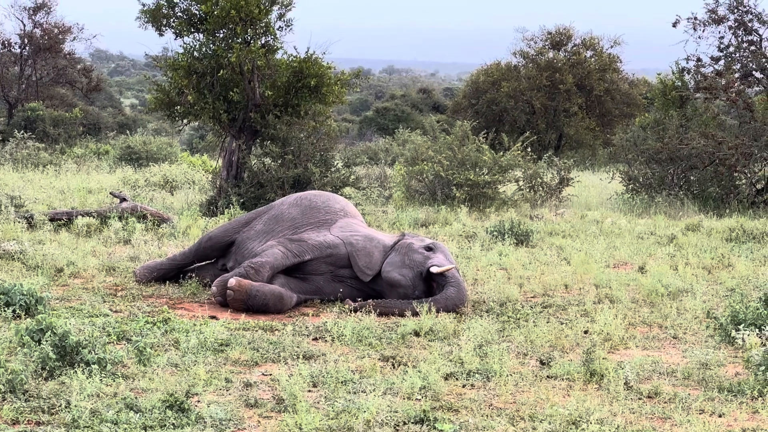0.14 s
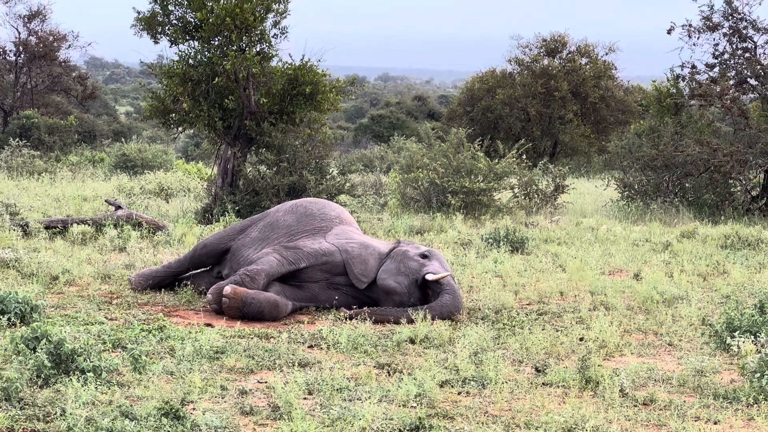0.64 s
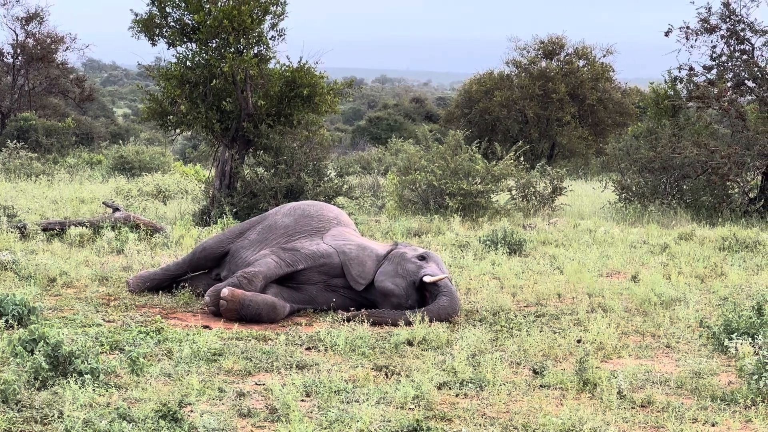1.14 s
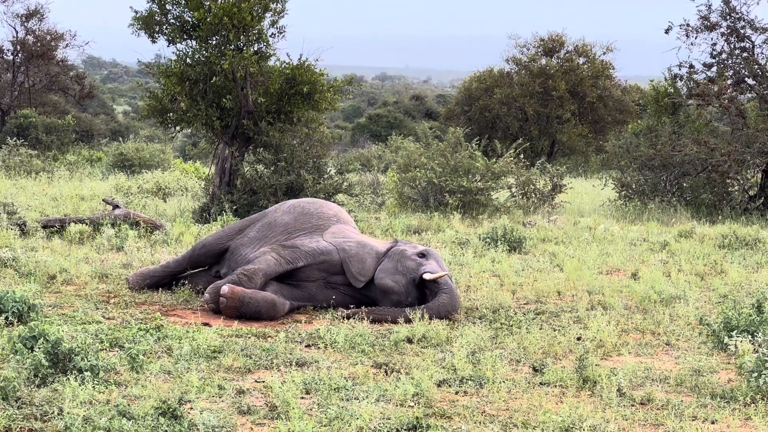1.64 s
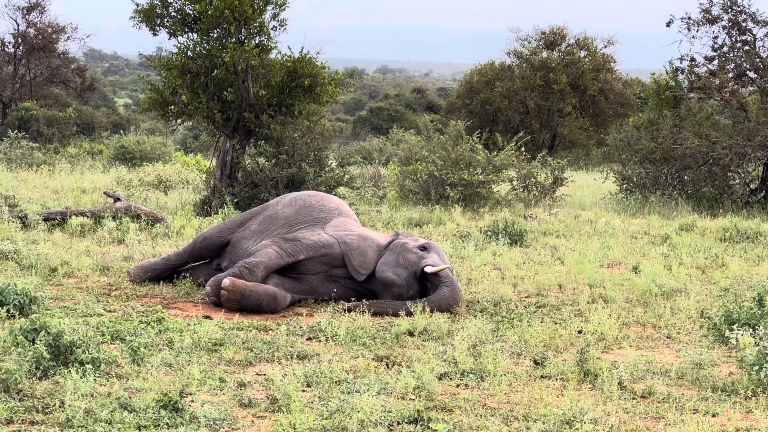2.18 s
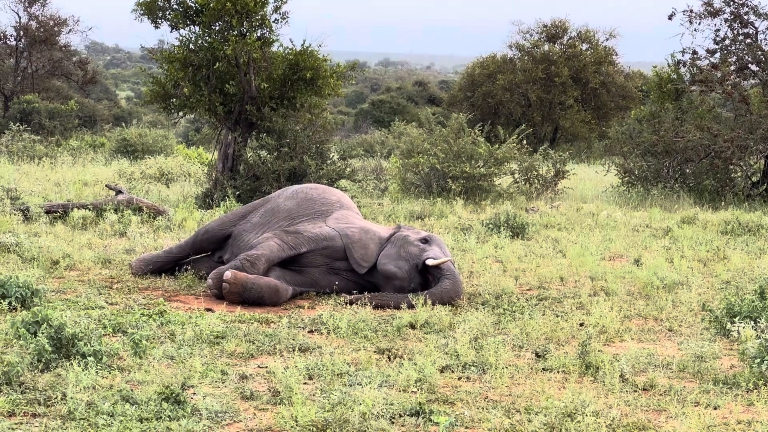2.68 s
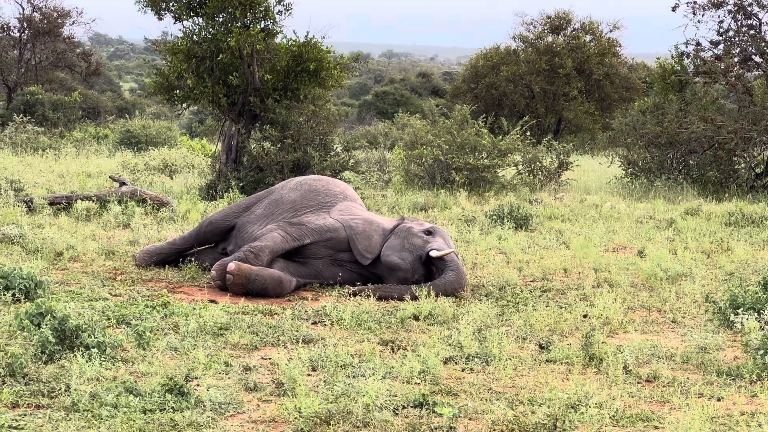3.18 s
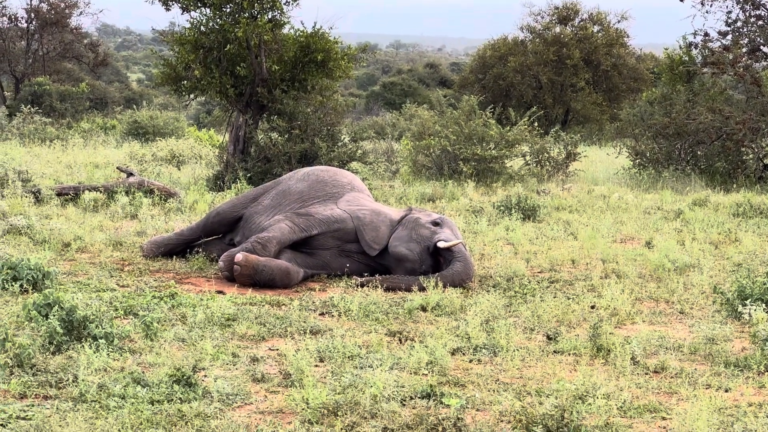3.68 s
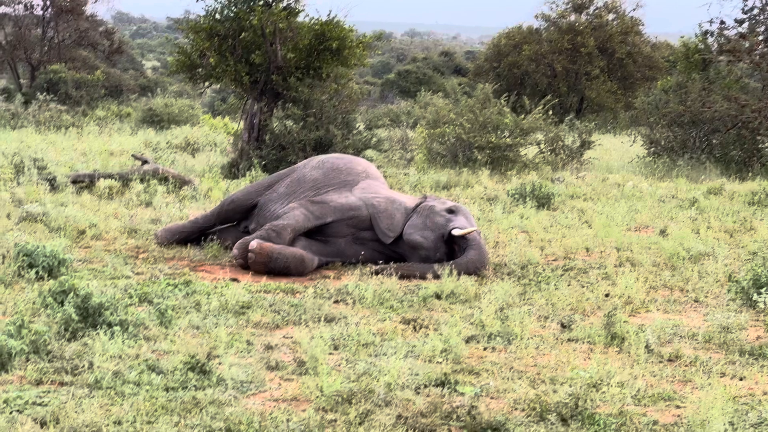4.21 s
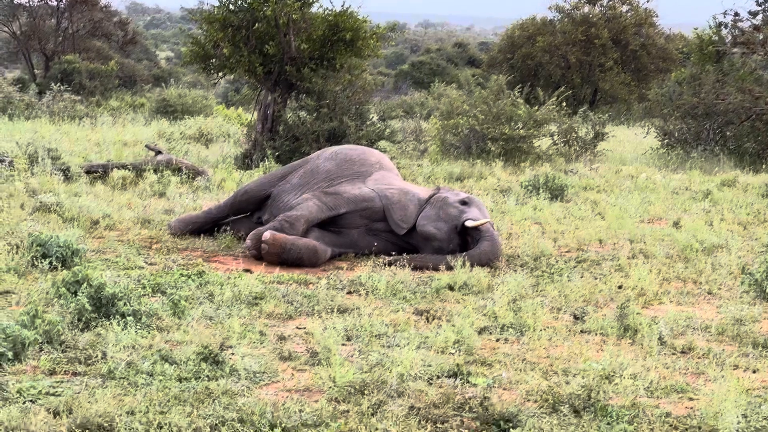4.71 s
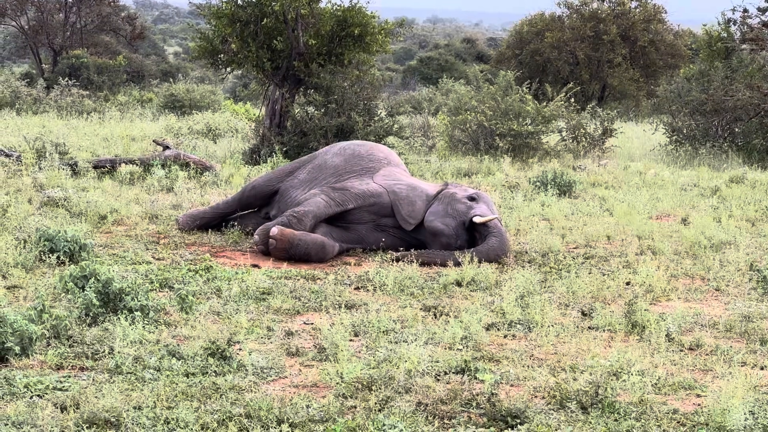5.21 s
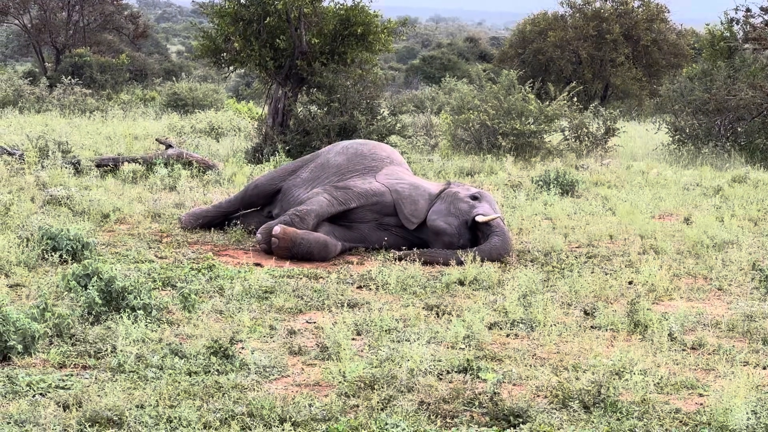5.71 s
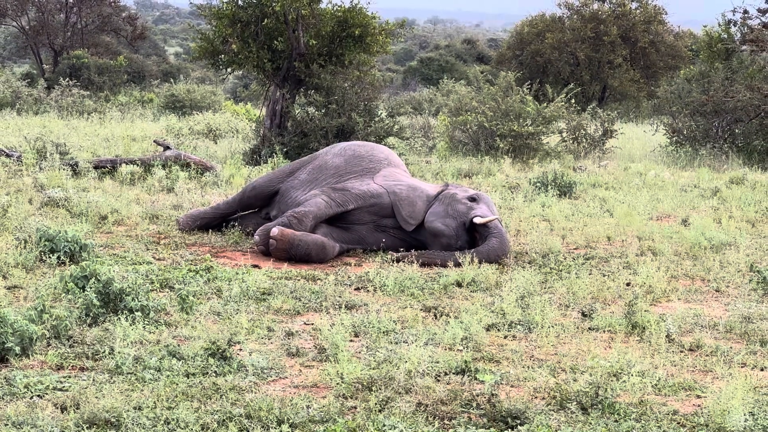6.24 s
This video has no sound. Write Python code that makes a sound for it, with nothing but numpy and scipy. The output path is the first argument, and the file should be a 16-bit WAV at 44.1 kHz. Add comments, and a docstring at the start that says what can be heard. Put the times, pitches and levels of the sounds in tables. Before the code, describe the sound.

Open bush with several small birds, heard in wide stereo on a handheld microphone, with short faint echoes, distant twitter and a steady soft hiss. A very high rapid trill and small bumps open the scene, then quick chirps from 0.3 to 0.6 s and a falling whistle near 0.7. Cloth swishes close by at 0.75-1.0 s, with two sharp ticks. Dense sliding chirps follow from 1 to 2 s. Low thumps land at 1.4, around 1.7 and, hardest, 2.07 s, with low wind puffs. From 2.1 to 2.9 s one bird repeats a faint falling whistle beneath louder chirps and a fluttering note. Calls are sparser from 3 to 4.5 s, with thin high descending whistles. Soft cloth rustles from about 4.4 to 5.8 s among more chirps. After 5.9 s come faint hoarse calls, a climbing rattling trill, a long high wavering whistle and a final bump.

```python
"""Open bush at dawn: small birds in chorus, on a hand-held camera, the sound widened from mono to stereo.
Near birds are gliding sine whistles and trills of sliding chips, with echoes off trees and ground.
Far off lie a faint twitter of short notes and a steady noise hiss.
At the microphone, low noise makes light wind puffs, and sagging tones and snaps make bumps and ticks.
Close by, cloth swishes and rustles as shaped noise."""
import sys
import numpy as np
from scipy import signal
from scipy.fft import rfft, irfft, next_fast_len
from scipy.io import wavfile
from scipy.ndimage import uniform_filter1d

SR = 44100
rng = np.random.default_rng(int(sys.argv[2]) if len(sys.argv) > 2 else 0)


def int16_out(signal):
    """Quantize to a 16-bit WAV file."""
    q = np.round(np.clip(np.atleast_2d(signal).T, -1, 1) * 32767)
    wavfile.write(sys.argv[1], SR, q.astype(np.int16))


def gain_from_decibels(decibels):
    """Convert decibel values to linear amplitude factors."""
    exponent = np.asarray(decibels, float) / 20
    return 10 ** exponent


N = 280476  # samples in the scene


def read(points, at):
    """Joins table points by straight lines on a log axis."""
    where, value = np.transpose(points)
    return np.interp(np.log(at + 1), np.log(where + 1), value)


def add(mix, s, sound):
    """Mixes a sound in at second s."""
    part = mix[max(round(s * SR), 0):][:len(sound)]
    part += sound[:len(part)]


def unit_rasp(count):
    """Smoothed noise of unit strength, for the roughness of breath."""
    rasp = uniform_filter1d(rng.standard_normal(count), size=48)
    return rasp / rasp.std()


def band_noise(low_hz, high_hz, order, count):
    """White noise passed through one band, at unit strength."""
    sos = signal.butter(order, [low_hz, high_hz], "bandpass", fs=SR, output="sos")
    out = signal.sosfilt(sos, rng.standard_normal(count))
    return out / out.std()


def note(rows, db, edge_s=.004, waver_db=1.5, flutter_hz=55):
    """A near-pure whistle: rounded pitch corners, ends that fade, slightly unsteady breath."""
    s, hz = np.transpose(rows)
    t = np.arange(s[0] - edge_s, s[-1] + edge_s, 1 / SR)
    pitch = uniform_filter1d(np.interp(t, s, hz), size=70)
    waver = uniform_filter1d(rng.standard_normal(len(t)), size=200) * np.sqrt(200)
    pitch += 12 * np.roll(waver, len(t) // 2)  # the throat trembles by some Hz
    if 2300 < hz.mean() < 4400:  # middle voices flutter fast in pitch
        pitch += flutter_hz * np.sin(2 * np.pi * 170 * t)
    fade_s = 2 * edge_s + 0.057 * (s[-1] - s[0])  # long notes swell and die more slowly
    nearest_end_s = np.minimum(0.95 * (t - t[0]), t[-1] - t)
    ends = np.sin(np.pi / 2 * np.clip(nearest_end_s / fade_s, 0, 1))
    wave = np.sin(2 * np.pi * (np.cumsum(pitch) / SR + rng.random()))
    return t[0], np.sqrt(2) * gain_from_decibels(db + waver_db * waver) * ends * wave


def shaped(shape, start, end, a_hz, b_hz, db, **voice):
    """A note stretched from a shape: pitch share 0 lies at a_hz, share 1 at b_hz."""
    when, way = np.transpose(shape)
    return note(np.transpose([start + when * (end - start), a_hz + way * (b_hz - a_hz)]), db, **voice)


# likeness of diffuse sound between left and right: f/Hz, likeness [0 to 1]
ALIKE = [(500, 1), (1000, 0.5), (1900, 0.62), (2300, 0.85)]


def noise(tone, level, patchy_db, size=512):
    """Two-channel noise with a spectrum, a level curve and drifting patches."""
    hop, bins = size // 4, size // 2 + 1
    frames, hz = N // hop + 5, np.fft.rfftfreq(size, 1 / SR)
    a, b, c, d, patches = rng.standard_normal((frames, bins, 5)).T
    patches = uniform_filter1d(uniform_filter1d(patches, size=9, axis=0), size=9, axis=1)
    same = np.clip(read(ALIKE, hz), -1, 1)[:, None]
    left, other = a + 1j * b, c + 1j * d
    z = np.array([left, same * left + np.sqrt(1 - same ** 2) * other])
    z *= gain_from_decibels(read(tone, hz)[:, None] + patchy_db * patches / patches.std())
    out = signal.istft(z, nperseg=size, noverlap=size - hop)[1][:, :N]
    return out / out.std() * gain_from_decibels(np.interp(np.arange(N) / SR, *np.transpose(level)))


# spectrum of the far hiss: f/Hz, relative level/dB per Hz
FAR_TONE = [(100, 0), (300, 5.5), (1000, -4), (2200, 1), (4500, -5), (6000, -12.5), (9000, -22),
            (15500, -32.5)]


def far_hiss():
    """Steady distant air: shaped noise at one level throughout."""
    return noise(FAR_TONE, [(0, -75), (N / SR, -75)], patchy_db=2.5)


def far_twitter(mix, db=-81, count=200):
    """Distant birds: many faint short notes at chance times and pitches."""
    for when, height, slide, length, size in rng.random((count, 5)):
        s, hz = when * N / SR, 1800 * 2.8 ** height
        rows = [(s, hz), (s + .01 + 0.093 * length ** 2, hz * (0.9 + .17 * slide))]
        add(mix, *note(rows, db - 9 * size))


# puffs of wind on the microphone: start t/s, end t/s, level/dB
WIND = [(0.036, 0.09, -55), (0.239, 0.343, -56.5), (1.107, 1.282, -56.5), (1.36, 1.604, -56.5),
        (1.703, 1.971, -52), (2.135, 2.201, -49.5), (2.313, 2.514, -61.5), (2.681, 2.905, -59.5),
        (3.148, 3.611, -63.5), (3.863, 4.421, -57.5), (4.57, 5.085, -67.5), (5.379, 5.813, -57.5),
        (6.064, 6.373, -60.5)]
# spectrum of the puffs: f/Hz, relative level/dB per Hz
GUST_TONE = [(25, -34), (55, 15), (130, -13), (300, -62.5)]


def wind(calm_db=-76):
    """Low noise on the microphone: each puff rises and falls in about 30 ms out of a calm."""
    level = []
    for start, end, db in WIND:
        level += [(start - .03, calm_db), (start, db), (end, db), (end + 0.033, calm_db)]
    return noise(GUST_TONE, level, patchy_db=4.0, size=1024)


def trill(start, end, hz, rate, db, climb_hz=0, steepness=1, slowing=0, uneven_db=3.5, sharp=1.2, rough=1):
    """A run of short chips of uneven strength, each sliding in pitch, swelling through the run."""
    t = np.arange(0, end - start, 1 / SR)
    beats = rate * t * (1 - slowing * t)  # a strong slowing turns the count, and the slides, back
    chip, back = beats % 1, (beats + .5) % 1
    middle = hz + np.linspace(0, climb_hz, len(t))
    reach_hz = steepness * 52000 / rate  # a chip slides from this far above the middle to as far below

    def stroke(u, span):
        pitch = middle + span * (1 - 2 * u)
        return np.sin(np.pi * u) ** (2 * sharp) * np.sin(2 * np.pi * np.cumsum(pitch) / SR)

    # a fainter stroke, sliding the other way, fills the gaps between chips
    wave = stroke(chip, reach_hz) + rough * gain_from_decibels(-11) * stroke(back, -.6 * reach_hz)
    swell = signal.windows.tukey(len(t), .3) * np.linspace(.6, 1, len(t))
    size = gain_from_decibels(db + uneven_db * rng.standard_normal(64)[beats.astype(int)])
    return start, 2 * size * swell * wave * (1 + rough * 0.27 * unit_rasp(len(t)))


# one smooth, fast trill: start t/s, end t/s, f/Hz, chips at first [per s], level/dB,
# climb f/Hz, steepness [ratio], slowing [per s], unevenness level/dB
BUZZ = (0.01, 0.267, 7479.5, 226, -60, -420, 1.1, 0, 1.3)


def buzz(mix):
    """A high trill with neither breath rasp nor rebound strokes."""
    add(mix, *trill(*BUZZ, rough=0))


# knocks on the body: peak t/s, peak level/dB, f/Hz at the peak
BUMPS = [(.014, -42, 372), (0.028, -42.5, 420), (0.036, -34, 223), (1.045, -50.5, 220), (1.409, -32, 76.4),
         (1.665, -35, 114), (1.682, -28.5, 176), (1.706, -22.5, 122.2), (2.052, -37.5, 150),
         (2.064, -29.5, 395), (2.071, -20.5, 111.7), (2.147, -42, 262), (2.721, -50, 130),
         (4.038, -43.5, 102), (4.572, -50, 480), (4.71, -42.5, 111), (5.396, -49.5, 219),
         (5.466, -42, 62.3), (6.312, -37, 72.3), (6.356, -26.5, 153)]


def bump(s, db, hz, rise=0.63, fall=1.21, sag=2.22, rumble_db=-16, rumble_cycles=1.78):
    """A soft knock on the body: a cycle or two whose pitch sags as it dies, inside a lumpy rumble."""
    u = np.arange(-3, 5, hz / SR)  # time in cycles
    shape = np.exp(-.5 * (u / np.where(u < 0, rise, fall)) ** 2)
    knock = shape * np.cos(2 * np.pi * sag * (1 - np.exp(-np.maximum(u, -2) / sag)))
    lumps = band_noise(hz / 2, hz * 1.593, 5, len(u))
    lumps *= gain_from_decibels(rumble_db) * np.exp(-.5 * (u / rumble_cycles) ** 2)
    start = s + u[0] / hz
    skip = max(round(-start * SR), 0)  # whatever falls before the scene begins
    return start, gain_from_decibels(db) * (knock + lumps)[skip:]


# an even slide: share of length, share of the way in pitch
SLUR = [(0, 0), (1, 1)]
# start t/s, end t/s, first f/Hz, last f/Hz, level/dB
SLURS = [(0.053, 0.165, 2820, 3030, -73), (0.2, 0.232, 2920, 2840, -71.5), (0.315, 0.338, 6470, 5950, -56),
         (0.336, 0.36, 5920, 6380, -53.5), (0.368, 0.434, 6880, 6270, -53.5), (.485, .489, 4100, 4810, -56),
         (.489, .51, 4850, 3970, -53.5), (0.509, .535, 3960, 4290, -51.5), (.537, .541, 4540, 3200, -63),
         (0.54, 0.559, 4500, 2180, -61.5), (0.512, .532, 3310, 2520, -60), (0.537, 0.571, 2110, 3730, -62),
         (.578, .59, 2860, 3470, -53.5), (0.587, .605, 3420, 2690, -56.5),
         (0.603, 0.622, 3920, 4020, -62.5), (.964, 1.031, 5430, 4900, -56.5),
         (1.033, 1.085, 4910, 3950, -51), (1.089, 1.133, 3950, 3340, -59.5), (0.999, 1.1, 4140, 3950, -68),
         (1.093, 1.104, 2800, 3700, -63.5), (1.206, 1.23, 4240, 2900, -59.5),
         (1.203, 1.207, 1850, 4070, -60.5), (1.225, 1.269, 4380, 4500, -69),
         (1.267, 1.323, 5780, 5890, -67.5), (1.292, 1.306, 4310, 3560, -59),
         (1.347, 1.406, 1890, 1702, -65.5), (1.406, 1.434, 1700, 2020, -64.5),
         (1.375, 1.424, 6450, 7540, -72.5), (1.456, 1.52, 1914, 1628, -60.5),
         (1.521, 1.538, 1623, 2295, -65.5), (1.501, 1.658, 5860, 6950, -77.5),
         (1.631, 1.68, 4200, 4900, -72), (1.657, 1.694, 1837, 1980, -63), (1.679, 1.713, 3600, 2530, -62.5),
         (1.732, 1.744, 4350, 3890, -63.5), (1.743, 1.787, 3250, 3400, -68.5),
         (1.762, 1.789, 2300, 2370, -65), (1.792, 1.815, 3900, 4470, -60.5),
         (1.813, 1.834, 3400, 2920, -60), (1.895, 1.954, 3910, 3730, -71.5),
         (1.948, 2.028, 4100, 5140, -68.5), (2.378, 2.389, 2625, 3800, -59.5),
         (2.918, 2.945, 2236, 2773, -69), (3.202, 3.217, 3380, 2890, -58), (3.198, 3.273, 3950, 4760, -70),
         (3.323, 3.365, 7970, 6080, -71), (3.372, 3.44, 6200, 7200, -78.5), (3.563, 3.584, 3800, 4370, -56),
         (3.578, 3.586, 2670, 3000, -69), (3.727, 3.803, 2890, 3110, -75), (3.744, 3.752, 5300, 4590, -67),
         (3.74, 4.09, 8670, 7000, -69.5), (3.925, 3.94, 2800, 3810, -63.5), (4.019, 4.127, 2875, 3050, -78),
         (4.248, 4.506, 8840, 6170, -64), (4.368, 4.388, 5020, 3860, -64.5),
         (4.397, 4.425, 3400, 2580, -65.5), (4.597, 4.848, 8370, 6000, -65),
         (4.803, 4.844, 6400, 7670, -63), (4.9, 4.914, 4720, 3870, -65.5),
         (4.945, 5.003, 3873, 3800, -64.5), (4.974, 4.998, 1990, 2200, -66.5),
         (5.206, 5.249, 3766, 3880, -56.5), (5.268, 5.285, 2070, 2000, -62),
         (5.491, 5.546, 3100, 3390, -66), (5.33, 5.338, 4800, 3100, -63), (5.342, 5.349, 3140, 5250, -59),
         (5.356, 5.367, 5350, 4380, -64), (5.456, 5.46, 3580, 4350, -61), (5.465, 5.492, 4300, 3105, -61),
         (5.743, 5.763, 3800, 4340, -60.5), (5.844, 5.956, 8190, 7600, -72), (5.96, 6.057, 2240, 2283, -78),
         (5.985, 6.103, 1916, 1760, -75), (6.19, 6.208, 3770, 3580, -65.5)]


def slurs(mix):
    """Whistles that slide straight from one pitch to another."""
    for row in SLURS:
        add(mix, *shaped(SLUR, *row))


# one bird repeats the same slow trill: start t/s, end t/s, level/dB
REELS = [(0.324, .455, -73), (1.692, 1.856, -73), (3.379, 3.533, -71.5), (6.145, 6.3, -75)]


def reels(mix):
    """A slow trill at one pitch and chip rate."""
    for start, end, db in REELS:
        add(mix, *trill(start, end, 4780, 54.5, db))


# level of the rustle: t/s, level/dB
RUSTLE = [(.35, -100), (0.548, -68.5), (.75, -100), (4.2, -100), (4.503, -62.5), (4.901, -67), (5.151, -60),
          (5.38, -66), (5.58, -62.5), (5.72, -64.5), (5.9, -100)]
# spectrum of the rustle: f/Hz, relative level/dB per Hz
RUSTLE_TONE = [(200, -1.5), (700, -3.5), (1600, -2.5), (3000, -9.5), (6000, -12), (9000, -26),
               (14000, -26.5)]


def rustle():
    """Cloth rustling close by: patchy shaped noise that comes and goes."""
    return noise(RUSTLE_TONE, RUSTLE, patchy_db=3.0)


# darts to a far pitch, then eases part of the way back: share of length, share of the way in pitch
SCOOP = [(0, 0.13), (.45, 0.94), (1, .75)]
# start t/s, end t/s, f/Hz at share 0, f/Hz at share 1, level/dB
SCOOPS = [(0.49, 0.513, 4200, 2780, -64), (1.104, 1.161, 3710, 2860, -59.5),
          (1.23, 1.245, 2910, 2430, -63.5), (1.326, 1.347, 3680, 2760, -60.5),
          (3.937, 3.996, 3600, 2824, -63.5), (3.97, 4.161, 6120, 6540, -75.5)]


def scoops(mix):
    """Whistles that dart away in pitch and ease back."""
    for row in SCOOPS:
        add(mix, *shaped(SCOOP, *row))


# slides gently, then breaks away: share of length, share of the way in pitch
DROP = [(0, 0.0032), (.62, 0.27), (1, 0.98)]
# start t/s, end t/s, f/Hz at share 0, f/Hz at share 1, level/dB
DROPS = [(1.184, 1.201, 4700, 3000, -60), (1.268, 1.284, 4550, 2970, -62.5),
         (1.311, 1.348, 2600, 1846, -55), (0.558, 0.577, 4500, 3550, -56), (.688, .854, 5535, 3990, -55),
         (2.839, 2.859, 4500, 3250, -64.5), (3.179, 3.198, 4600, 2930, -63.5),
         (3.444, 3.522, 7200, 5814, -71.5), (3.576, 3.713, 6740, 5820, -71),
         (3.773, 3.792, 4110, 2720, -58), (4.299, 4.503, 6100, 5780, -68.5),
         (4.916, 4.945, 4130, 2800, -67), (5.041, 5.166, 6420, 5000, -64.5), ]


def drops(mix):
    """Whistles that almost hold, then fall faster."""
    for row in DROPS:
        add(mix, *shaped(DROP, *row))


# level of the swish: t/s, level/dB
SWISH = [(0.722, -100), (0.778, -52.5), (0.942, -50.5), (1.0, -67), (1.1, -100)]
# spectrum of the swish: f/Hz, relative level/dB per Hz
SWISH_TONE = [(150, -2.5), (600, -3), (1100, -19.5), (2500, -9), (5000, -9.5), (9000, -9.5), (11000, -33.5),
              (13500, -21.5)]


def swish():
    """Cloth swishing close by: shaped noise that swells once, holds, then dies away."""
    return noise(SWISH_TONE, SWISH, patchy_db=1.9)


# snaps close to the microphone: t/s, level/dB
TICKS = [(0.824, -26.5), (0.955, -27.5), (2.042, -52.5), (3.102, -48),]


def tick(s, db):
    """A tiny dry snap: noise that dies within a few milliseconds."""
    t = np.arange(130) / SR
    return s, gain_from_decibels(db) * .5 * rng.standard_normal(len(t)) * np.exp(-t / 0.00057)


# flicks up to its top, then falls: share of length, share of the way in pitch
HOOK = [(0, 0.77), (.4, 0.011), (1, 1.0)]
# start t/s, end t/s, f/Hz at share 0, f/Hz at share 1, level/dB
HOOKS = [(1.615, 1.657, 2153, 1830, -62.5), (3.7, 3.833, 7000, 6650, -73.5),
         (4.415, 4.444, 8110, 7200, -63), (4.445, 4.486, 3760, 2680, -64), (5.084, 5.105, 4840, 4110, -59),
         (5.369, 5.386, 4780, 4490, -56.5), (5.623, 5.678, 4000, 2650, -66)]


def hooks(mix):
    """Whistles that flick up and fall."""
    for row in HOOKS:
        add(mix, *shaped(HOOK, *row))


# leaps, tumbles, bounces: share of length, share of the way in pitch
TUMBLE = [(0, .55), (.09, 0), (.17, .28), (.36, .53), (.45, 1.0), (.72, .55), (.86, .97), (1, 1.05)]
# start t/s, end t/s, f/Hz at share 0, f/Hz at share 1, level/dB
TUMBLES = [(4.674, 4.732, 3700, 2050, -60), (1.715, 1.765, 3450, 2300, -60.5),
           (2.766, 2.819, 3750, 2050, -58), (2.868, 2.92, 4450, 2500, -62.5)]


def tumbles(mix):
    """Whistles that leap, tumble down and bounce."""
    for row in TUMBLES:
        add(mix, *shaped(TUMBLE, *row))


# leaps, plunges, settles: share of length, share of the way in pitch
PLUNGE = [(0, .7), (.12, 0.032), (.2, .3), (.37, .62), (.42, .43), (.5, 1.0), (.72, .83), (1, .83)]
# one phrase repeated over the same range: start t/s, end t/s, level/dB
PLUNGES = [(1.813, 1.875, -58.5), (3.586, 3.645, -58), (5.764, 5.824, -61.5)]


def plunges(mix):
    """A whistled phrase that leaps, plunges and settles low."""
    for start, end, db in PLUNGES:
        add(mix, *shaped(PLUNGE, start, end, 4400, 2300, db))


# start t/s, end t/s, f/Hz, chips [per s], level/dB
TRILLS = [(1.874, 1.919, 2630, 110, -60.5), (3.645, 3.68, 2620, 106, -59), (5.821, 5.864, 2600, 105, -63),
          (5.877, 6.135, 5180, 110, -73), (6.312, 6.35, 2530, 72, -62.5)]
# two more; after the level: climb f/Hz, steepness [ratio], slowing [per s; below 0 quickens],
# unevenness level/dB, chip sharpness [exponent]
PIPS = (5, 5.124, 2250.5, 55.5, -62.5, 200, 0.2, -1, 3, .5)
RATTLE = (6, 6.29, 2450.5, 101.5, -54.5, 2149, 3.5, 3, 2.5, 3)


def trills(mix):
    """Rough-breathed trills with rebound strokes; the last two climb in pitch."""
    for row in TRILLS + [PIPS, RATTLE]:
        add(mix, *trill(*row))


# a falling whistle that flicks up first: t/s from its start, f/Hz
REFRAIN = [(0, 5048.5), (.013, 5241), (.05, 4503.5), (.07, 4353), (.08, 3997)]
# one bird's calls of it: start t/s, level/dB
REFRAINS = [(2.128, -72.5), (2.255, -73), (2.387, -72), (2.526, -71), (2.669, -70.5), (2.822, -69.5)]


def refrains(mix):
    """One bird repeating the same short whistle."""
    for s, db in REFRAINS:
        add(mix, *note(np.add(REFRAIN, (s, 0)), db))


# faint, brief tones after the hardest knock: start t/s, end t/s, first f/Hz, last f/Hz, level/dB
AFTER_TONES = [(2.151, 2.236, 1045, 993, -74), (2.207, 2.259, 311, 324, -66.5)]


def after_tones(mix):
    """Faint low tones of very unsteady level."""
    for row in AFTER_TONES:
        add(mix, *shaped(SLUR, *row, waver_db=4.5))


# start t/s, end t/s, middle f/Hz at first, middle f/Hz at last, level/dB
ZIGZAGS = [(2.348, 2.37, 4450, 3390, -59.5), (3.75, 3.769, 4250, 3730, -66),
           (3.9, 3.918, 3950, 3640, -66.5), (5.173, 5.206, 3750, 3350, -59),
           (5.305, 5.332, 4450, 4010, -60), (5.43, 5.445, 4300, 4400, -66),
           (5.695, 5.73, 7300, 6840, -72.5)]


def zigzag(start, end, first_hz, last_hz, db):
    """A slur thrown quickly down and up in pitch."""
    s = np.arange(start, end, .0005)
    swing = signal.sawtooth(2 * np.pi * ((s - start) / .013 + .5), .5)  # one swing in 13 ms
    middle = np.linspace(first_hz, last_hz, len(s))
    return note(np.transpose([s, middle + 453 * swing]), db)


# drops at once, then lies nearly level: share of length, share of the way in pitch
SETTLE = [(0, 0), (.09, .7), (.4, 1), (1, .9)]
# one note: start t/s, end t/s, f/Hz at share 0, f/Hz at share 1, level/dB
QUAVER = (2.389, 2.5, 3849.5, 2899.5, -54.5)


def quaver(mix):
    """A note that drops and settles, with a wide, fast flutter in pitch."""
    add(mix, *shaped(SETTLE, *QUAVER, flutter_hz=150))


# flicks up, dives, levels out: share of length, share of the way in pitch
DIVE = [(0, .65), (.32, 0.016), (.5, .75), (1, 1.0)]
# start t/s, end t/s, f/Hz at share 0, f/Hz at share 1, level/dB
DIVES = [(2.738, 2.764, 4600, 2760, -59), (4.646, 4.676, 4400, 2760, -60.5)]


def dives(mix):
    """Whistles that flick up, then dive."""
    for row in DIVES:
        add(mix, *shaped(DIVE, *row))


# hollow moments of the rustle: start t/s, end t/s, f/Hz, level/dB
FOLDS = [(4.48, 4.74, 790, -64.5), (5.4, 5.762, 1440, -59.5)]


def fold(start, end, hz, db):
    """Air pocket in the cloth: the rustle gathers round one broad pitch."""
    size = round((end - start) * SR)
    return start, gain_from_decibels(db) * band_noise(hz / 1.27, hz * 1.21, 2, size) * np.hanning(size)


# tones of a hoarse, throbbing call: start t/s, end t/s, first f/Hz, last f/Hz, level/dB
HOARSE = [(5.89, 6.13, 4780, 4050, -70.5), (5.885, 5.995, 6350, 6000, -75.5),
          (5.89, 6.06, 3260, 2900, -76.5), (6.205, 6.315, 3000, 2300, -73)]


def hoarse(start, end, first_hz, last_hz, db):
    """A slur broken up by a fast throb and smeared by a rasp of breath."""
    s, sound = note([(start, first_hz), (end, last_hz)], db, waver_db=1)
    t = s + np.arange(len(sound)) / SR
    throb = gain_from_decibels(1.5 * np.sin(2 * np.pi * 110 * t))  # 1.5 dB either way, 110 times a second
    return s, sound * throb * (1 + 0.78 * unit_rasp(len(sound)))


# one long high whistle that wavers in pitch: t/s, f/Hz
WHISTLE = [(6.008, 6370), (6.06, 6790), (6.245, 6545), (6.31, 6700), (6.361, 6620)]


def whistle(mix):
    """A long whistle of nearly steady level."""
    add(mix, *note(WHISTLE, -56, waver_db=-0.4))


def chorus():
    """Every near bird note, over the far twitter."""
    birds = np.zeros(N)
    for sing in (far_twitter, buzz, slurs, reels, scoops, drops, hooks, tumbles, plunges,
                 trills, refrains, quaver, dives, whistle):
        sing(birds)
    for row in ZIGZAGS:
        add(birds, *zigzag(*row))
    for row in HOARSE:
        add(birds, *hoarse(*row))
    return birds


def bush(x, t60=0.19):
    """Scattered echoes from trees and ground, differing from side to side."""
    t = np.arange(SR // 2) / SR
    hits = rng.standard_normal((2, len(t))) * (rng.random((2, len(t))) < .3)
    taps = hits * gain_from_decibels(-60 * t / t60) * (t > .01)
    taps[1] = 1.4 * taps[0] + 0.27 * taps[1]
    taps /= np.linalg.norm(taps, axis=1, keepdims=True)
    return signal.fftconvolve(x[None], taps, axes=1)[:, :N]


def handling():
    """Bumps, ticks, hollow folds of cloth and the tones after the hardest knock."""
    hand = np.zeros(N)
    for source, rows in ((bump, BUMPS), (tick, TICKS), (fold, FOLDS)):
        for row in rows:
            add(hand, *source(*row))
    after_tones(hand)
    return hand


def scene():
    """Birds with their echoes, far hiss, wind, handling and cloth."""
    birds = chorus()
    air = far_hiss() + wind()
    cloth = swish() + rustle()
    return birds + gain_from_decibels(-11.0) * bush(birds) + handling() + air + cloth


# stereo spreader: f/Hz, phase by which left leads right [radians]
LEAD = [(500, -.58), (800, .7), (1400, 2.4), (2100, .35), (3000, .75), (5600, .2), (6800, .5), (7450, 3.1),
        (8300, 5.9), (9500, 5.1), (10400, 3.2), (12200, 3.0), (13300, .2)]


def spread(dry):
    """A stereo spreader turns left and right apart in phase, by frequency; both band ends are limited."""
    size = next_fast_len(N)
    hz = np.fft.rfftfreq(size, 1 / SR)
    edge = (hz < 15750) * hz ** 2 / (hz ** 2 + 20 ** 2)
    turn = np.exp(.5j * read(LEAD, hz))  # half the lead on each side
    return irfft(rfft(dry, size) * edge * np.array([turn, 1 / turn]), size)[:, :N]


def top_cut(x):
    """Nothing passes above the cut-off."""
    return signal.sosfilt(signal.butter(12, 15890, fs=SR, output="sos"), x)


def record(dry):
    """The finished mix: the scene spread to stereo and limited in band."""
    mix = spread(dry)
    return top_cut(mix)


dry = scene()
out = record(dry)
int16_out(out)
```